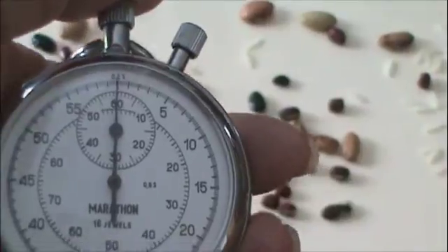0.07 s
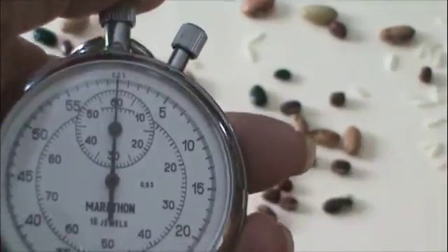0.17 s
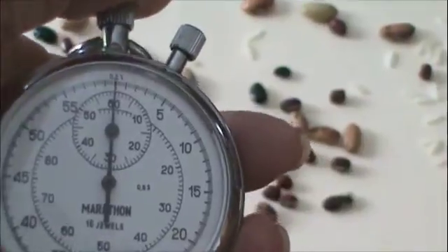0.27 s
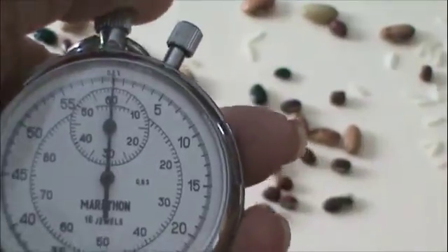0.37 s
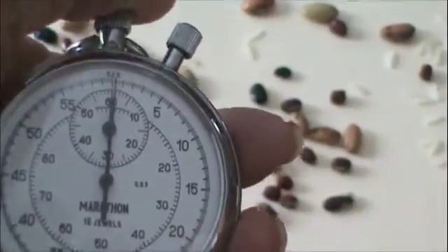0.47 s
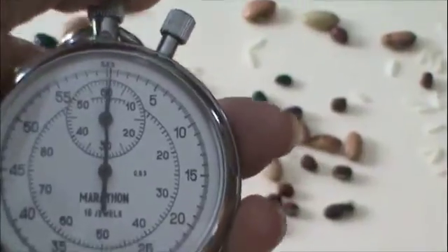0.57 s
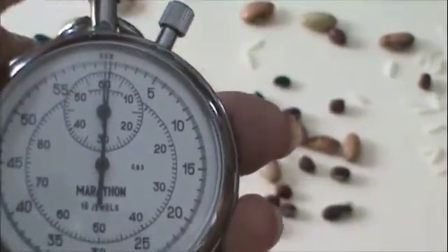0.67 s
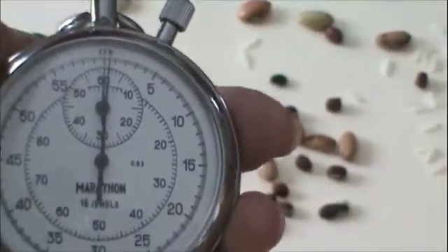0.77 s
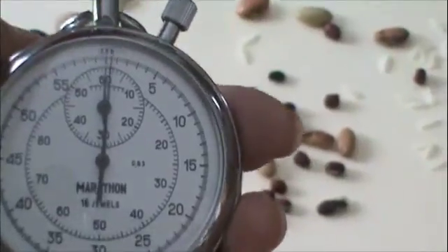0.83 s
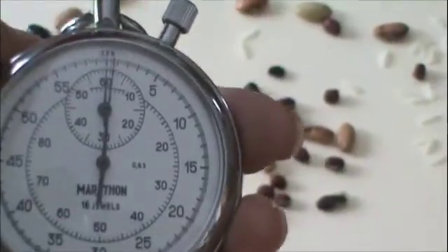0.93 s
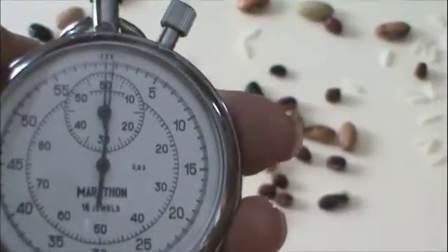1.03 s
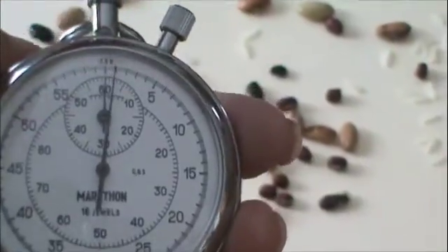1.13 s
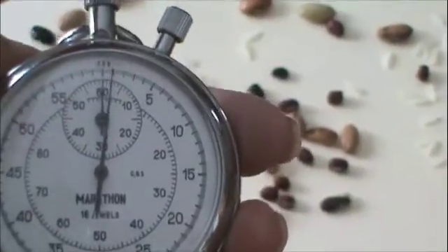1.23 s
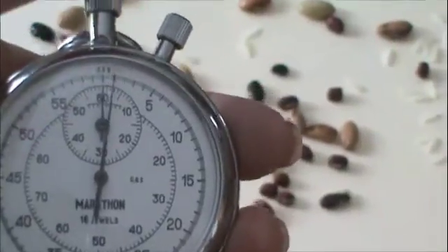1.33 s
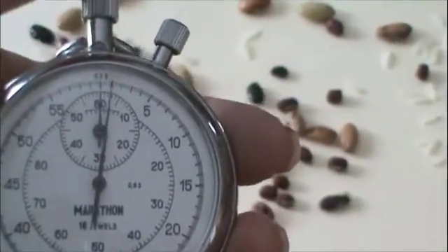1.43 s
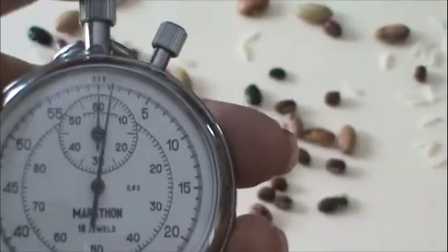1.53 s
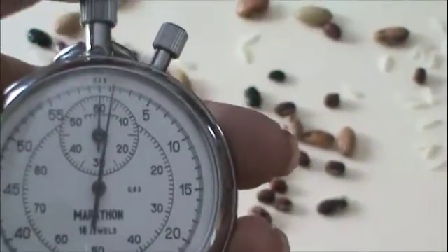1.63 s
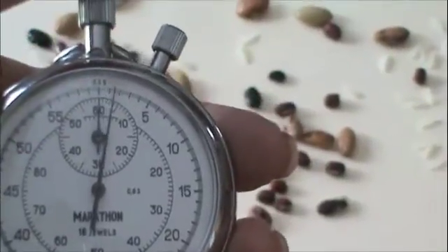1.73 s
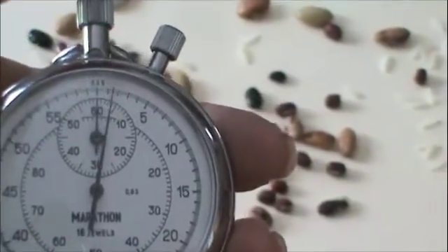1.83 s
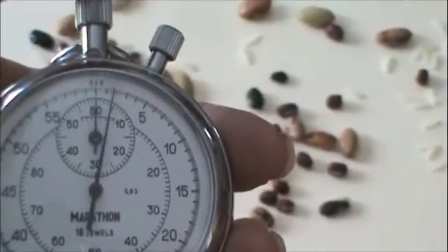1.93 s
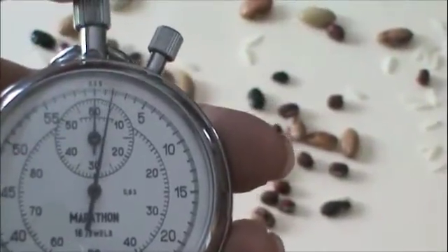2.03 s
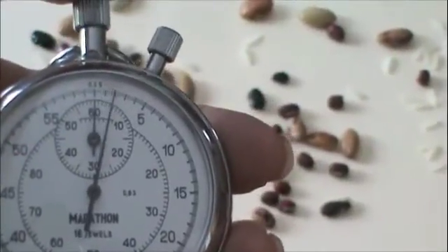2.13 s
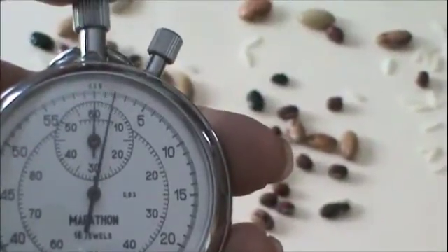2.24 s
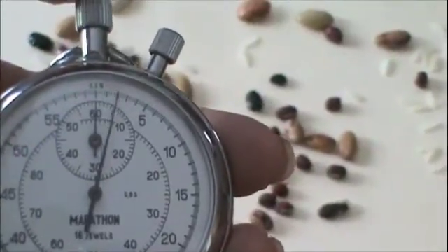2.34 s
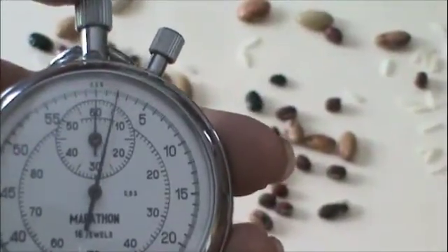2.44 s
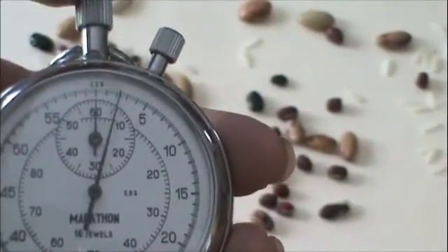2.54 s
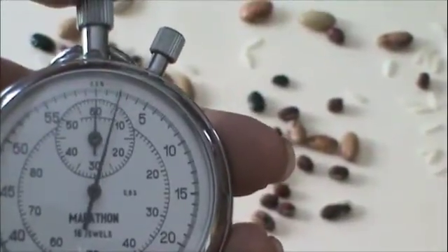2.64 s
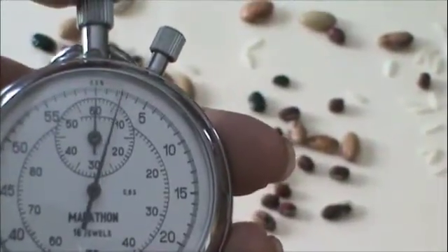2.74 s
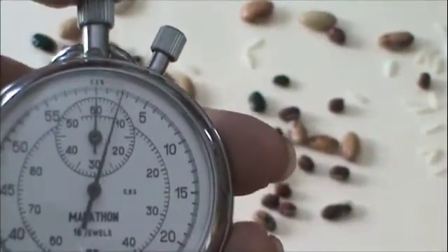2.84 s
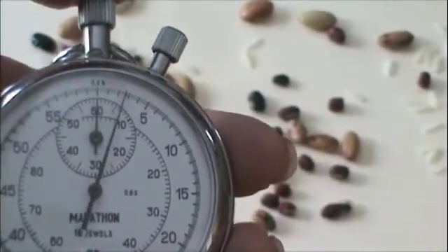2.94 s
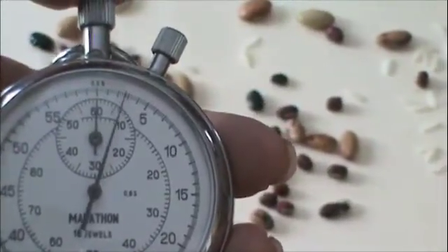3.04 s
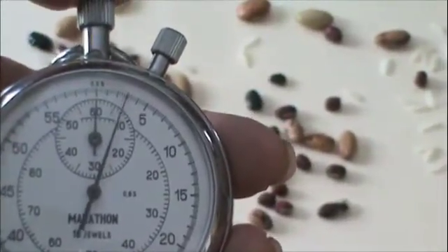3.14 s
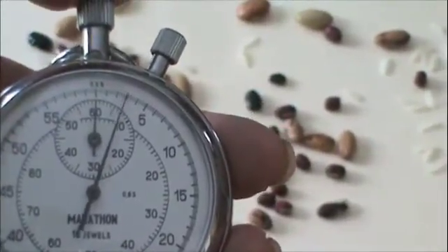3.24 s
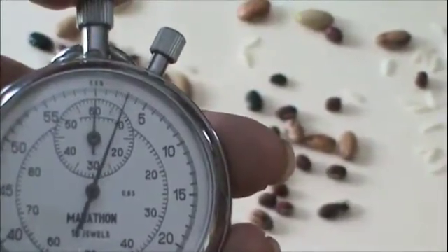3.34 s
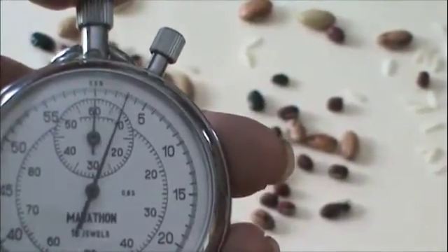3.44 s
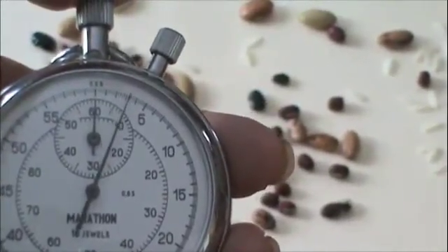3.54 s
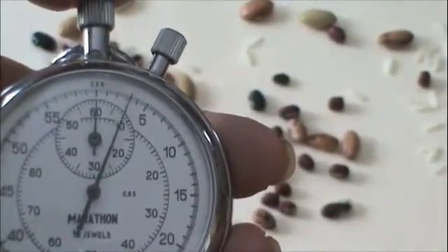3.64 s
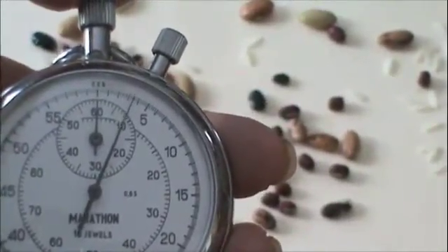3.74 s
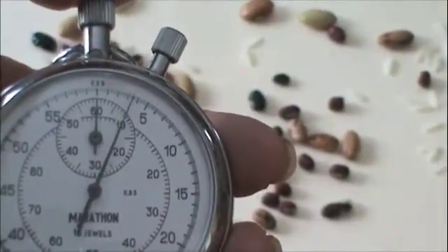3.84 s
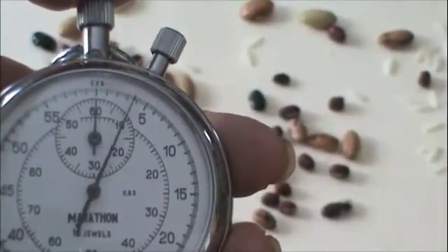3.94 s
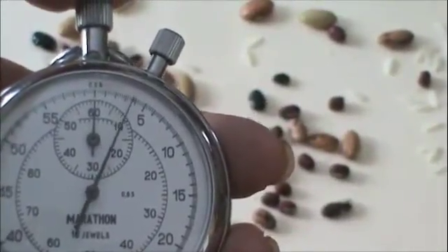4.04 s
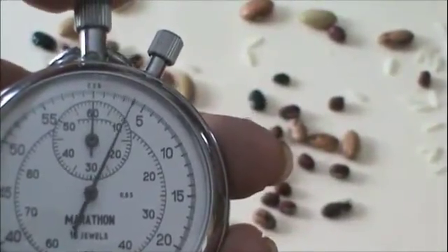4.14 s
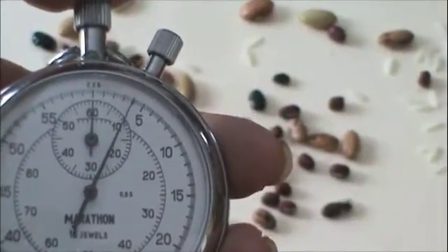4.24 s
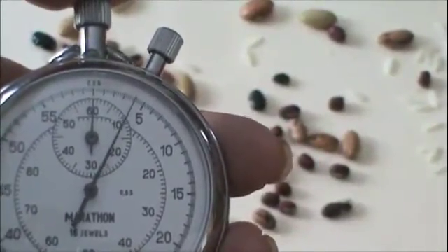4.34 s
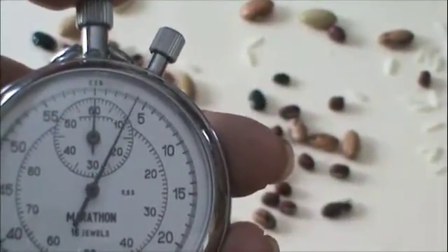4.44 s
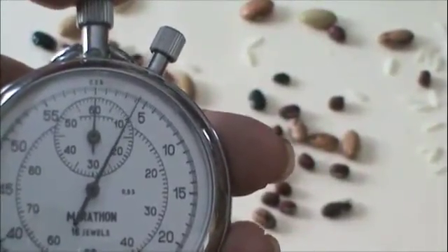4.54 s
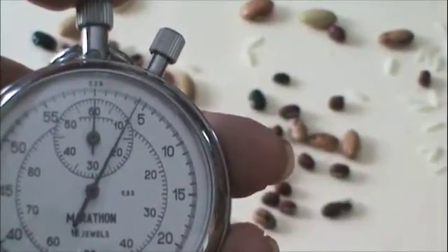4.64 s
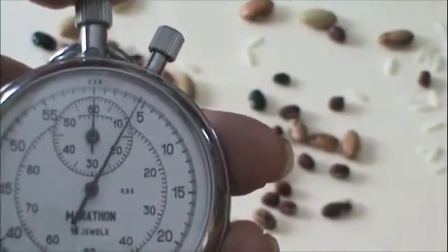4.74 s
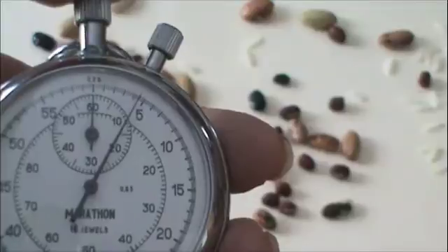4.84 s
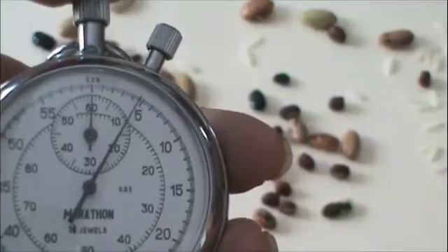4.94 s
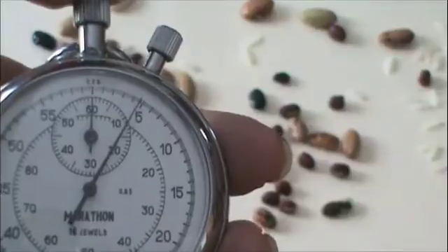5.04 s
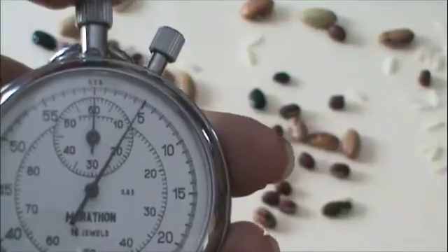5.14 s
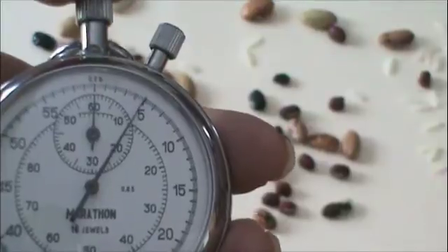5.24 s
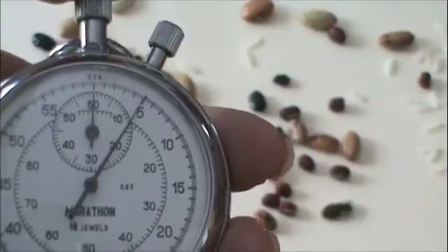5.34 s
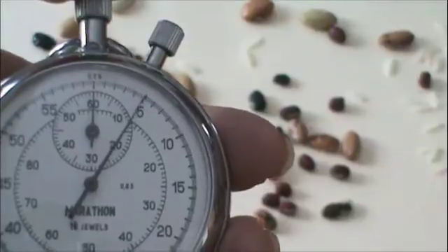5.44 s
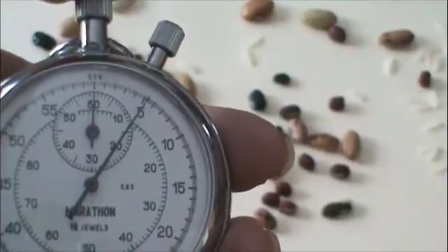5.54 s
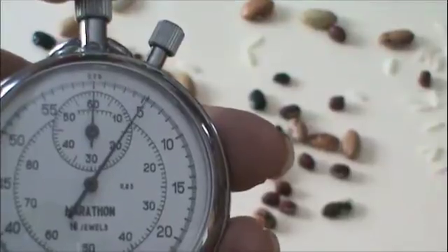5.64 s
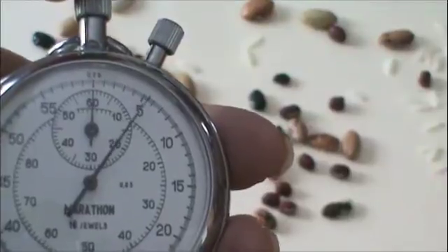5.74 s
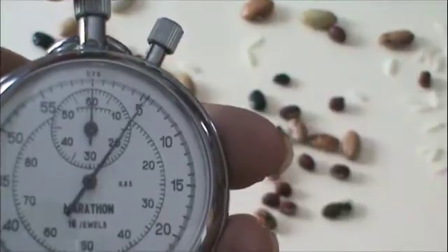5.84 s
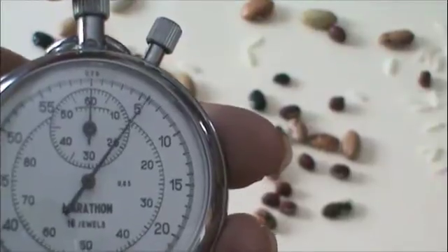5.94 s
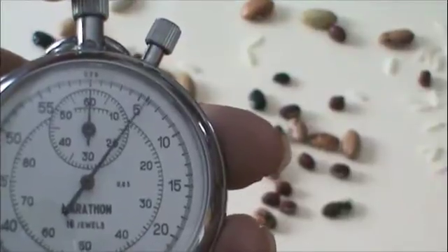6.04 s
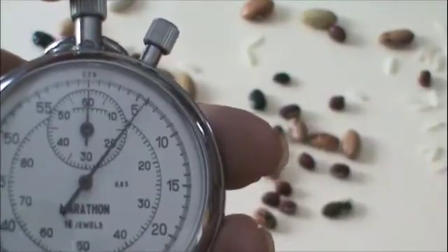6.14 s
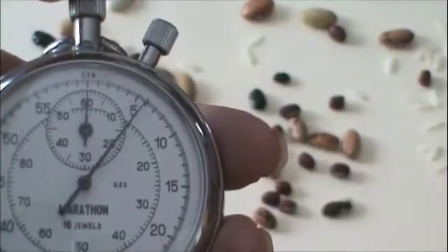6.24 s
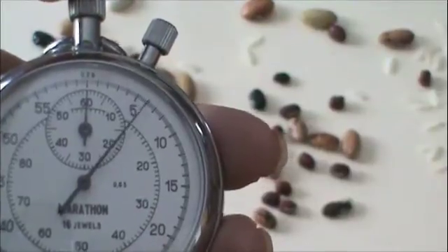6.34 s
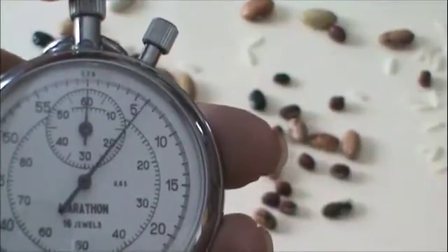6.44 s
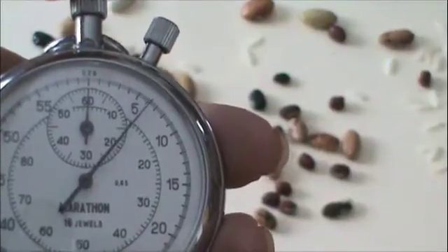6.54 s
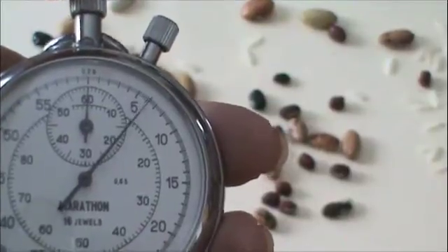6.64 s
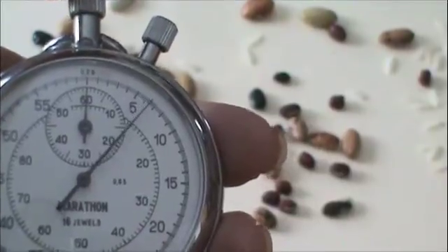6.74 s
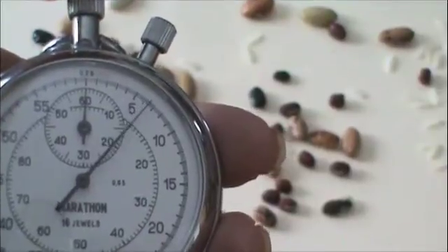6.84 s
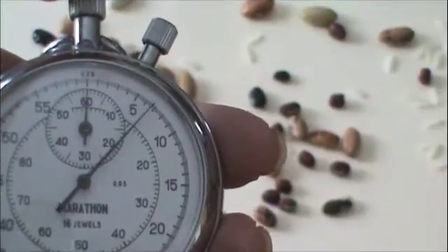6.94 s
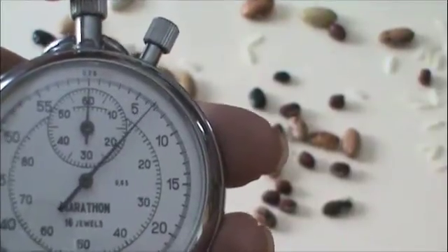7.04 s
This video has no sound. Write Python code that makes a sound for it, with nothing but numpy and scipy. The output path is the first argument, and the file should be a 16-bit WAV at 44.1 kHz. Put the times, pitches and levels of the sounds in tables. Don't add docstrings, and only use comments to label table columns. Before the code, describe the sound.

Crisp steel button clicks with a brief springy ring, a short camera motor purr, then thin rapid ticking in a small humming room.

```python
import sys
import numpy as np
from scipy import signal
from scipy.fft import rfft, irfft
from scipy.io import wavfile
from scipy.ndimage import uniform_filter1d

SR = 44100
rng = np.random.default_rng(int(sys.argv[2]) if len(sys.argv) > 2 else 0)


def store_wav(level_fs):
    pcm = np.round(np.clip(np.atleast_2d(level_fs), -1, 1) * 32767)
    wavfile.write(sys.argv[1], SR, pcm.T.astype(np.int16))


def magnitude_from_level(level_db):
    exponent = np.asarray(level_db, float) / 20
    return 10 ** exponent


N = 313234


def evened(x):
    return x / np.sqrt(np.mean(x ** 2) + 1e-20)


def read(points, hz):
    f, value = np.transpose(points)
    return np.interp(np.log(hz + 1), np.log(f + 1), value)


def follow(curve, column=1):
    rows = np.array(curve)
    return np.interp(np.arange(N) / SR, rows[:, 0], rows[:, column])


def wander(rate_hz):
    pole = np.exp(-2 * np.pi * rate_hz / SR)
    return evened(signal.lfilter([1], [1, -pole], rng.standard_normal(N)))


def ring(modes, rise_ms=0.249):
    t = np.arange(SR // 4) / SR
    body = 0
    for hz, width_hz, db in modes:
        body = body + magnitude_from_level(db) * np.exp(-np.pi * width_hz * t) * np.sin(2 * np.pi * hz * t)
    body *= (1 - np.exp(-1000 * t / rise_ms)) ** 2
    return body / abs(body).max()


def add(force, s, db, rattle_ms, habit=0):
    t = np.arange(500) / SR / (max(rattle_ms, .1) / 1000)
    grit = rng.standard_normal(500) * magnitude_from_level(2.0 * rng.exponential(1, 500)) + habit
    clatter = grit * t * np.exp(-2 * t)
    part = force[round(s * SR):][:500]
    part += (magnitude_from_level(db) * clatter / np.linalg.norm(clatter))[:len(part)]


def air():
    # pitch_hz, level_db (per Hz)
    air_color = [(15, -55), (40, -19), (110, -8.5), (200, -9.5), (330, -7.5), (500, -13.5), (950, -16),
                 (2200, -26), (5300, -28.5), (6200, -26.5), (7200, -29), (12000, -29), (15850, -29.5),
                 (16100, -50.5)]
    # pitch_hz, side_minus_mid_db
    side_share = [(60, -30), (99, -31.5), (160, -13.5), (270, -14.5), (450, -7), (740, -3), (1220, -0.5),
                  (2010, 4.5), (3330, 1), (5500, -0.5), (9080, -5.5), (15000, -22.5)]
    # pitch_hz, left_minus_right_db
    lean = [(60, -2.5), (240, 0.5), (950, -1.5), (3770, -0.5), (15000, -1)]
    frames, hz = N // 512 + 5, np.fft.rfftfreq(2048, 1 / SR)
    real, imaginary, patches = rng.standard_normal((3, 2, len(hz), frames))
    patches = uniform_filter1d(patches[0], size=20, axis=0)
    patches = evened(uniform_filter1d(patches, size=8, axis=1))
    z = (real + 1j * imaginary) * magnitude_from_level(read(air_color, hz)[:, None] + 0.63 * patches)
    z[1] *= magnitude_from_level(read(side_share, hz))[:, None]
    z[1] += z[0] * (np.log(10) / 40 * read(lean, hz))[:, None]
    mid, side = signal.istft(z, nperseg=2048, noverlap=1536)[1][:, :N]
    return magnitude_from_level(-59.5) * np.array([mid + side, mid - side]) / mid.std()


def duct():
    # time_s, level_db
    draught = [(0, -75), (1.4, -67), (3.3, -70.5), (3.8, -90), (4.6, -70), (6.6, -70.5), (7.2, -53.5)]
    hz, width_hz = 950, 90
    band = signal.butter(2, [hz - width_hz / 2, hz + width_hz / 2], "bandpass", fs=SR, output="sos")
    noise = signal.sosfilt(band, rng.standard_normal((2, N)))
    return magnitude_from_level(follow(draught) - 6.0) * evened(noise + 0.51 * noise[::-1])


def hum():
    # pitch_hz, level_db
    tones = [(47.3, -81.5), (59.2, -74), (65.8, -72), (94.6, -80.5), (141.9, -71), (189.2, -61.5),
             (236.6, -64.5), (261, -85), (296, -79), (380, -83.5), (391, -78), (426, -79.5), (15734, -87)]
    # time_s, pitch_hz, level_db
    far_motor = [(0, 122, -59.5), (.6, 125.5, -67), (1.5, 127.2, -64), (2.06, 130, -66.5),
                 (3.0, 135.2, -59.5), (3.26, 133.7, -61.5), (3.52, 122, -67.5), (3.74, 115, -64.5),
                 (4.0, 113.5, -66), (4.9, 116.5, -65.5), (5.3, 117.6, -59.5), (7.2, 120, -66)]
    t = np.arange(N) / SR
    steady = np.zeros(N)
    for hz, db in tones:
        level = magnitude_from_level(db + 1.15 * wander(0.88))
        phase = 2 * np.pi * (hz * t + rng.random()) + 0.39 * wander(0.36)
        steady += level * np.sin(phase)
    turns = np.cumsum(follow(far_motor)) / SR
    far = magnitude_from_level(follow(far_motor, column=2)) * np.sin(2 * np.pi * turns)
    return np.sqrt(2) * (steady + far)


def focus_motor():
    # time_s, level_db
    run = [(0, -52.5), (.4, -53), (1.1, -59), (1.3, -51.5), (1.8, -51.5), (2.22, -51.5), (2.27, -80),
           (7.2, -80)]
    # pitch_hz, width_hz, level_db
    camera_body = [(1826, 127, 2), (2352, 50, -4), (3470, 47, -11), (4770, 88, 1), (6760, 300, -7),
                   (8600, 600, -11.5)]
    # pitch_hz, width_hz, level_db
    gears = [(6050, 800, 2), (6600, 820, 0), (8700, 830, 2)]
    frames_per_s = 29.97
    force, run_db = np.zeros(N), follow(run)
    for s in np.arange(.0145, 2.3, 1 / frames_per_s):
        step_db = run_db[round(s * SR)]
        add(force, s, step_db - 3.0 + 1.2 * rng.standard_normal(), .1)
        add(force, s + 0.017, step_db - 12, 3.0)
    rubbing = magnitude_from_level(run_db - 28.5) * rng.standard_normal(N)
    whirr = signal.oaconvolve(rubbing, ring(gears))[:N]
    return signal.oaconvolve(force, ring(camera_body, rise_ms=1.14))[:N] + whirr


def room(x):
    # pitch_hz, t60_s
    decay = [(700, 0.9), (2500, 0.43), (5000, 1), (9000, 0.35), (15000, 0.54)]
    taps = np.zeros((2, SR))
    slots = np.arange(SR // 20 - 6) * 20 + 100
    at = slots + rng.integers(0, 20, (2, len(slots)))
    np.put_along_axis(taps, at, rng.choice([-1., 1.], at.shape), 1)
    hz, t, z = signal.stft(taps + 0.077 * taps[::-1], SR, nperseg=256)
    fade = magnitude_from_level(-60 * t / read(decay, hz)[:, None])
    tail = signal.istft(z * fade, SR, nperseg=256)[1]
    return signal.fftconvolve(x[None], tail / np.linalg.norm(tail[0]), axes=1)[:, :N]


def shudder():
    # start_s, rustle_db (rms), plate_db, t60_s
    chatters = [
        (.342, -65.5, -79, .25),
        (0.431, -39.5, -54, 0.65),
        (.682, -49.5, -71, 0.37),
    ]
    # pitch_hz, level_db (per Hz)
    rustle_color = [(700, -11.5), (1300, -4.5), (2600, 3.5), (3700, -7.5), (4800, -1.5), (5800, 2.5),
                    (6800, -4.5), (9000, 0), (12000, -7.5), (15500, -20.5)]
    # pitch_hz, width_hz, level_db
    back_plate = [(2330, 42, -15), (2793, 40, 0), (2870, 58, -2), (4770, 25, 1), (4820, 25.5, -2),
                  (6830, 65, 2.5), (8640, 90, -7), (9600, 110, -1), (13500, 220, -2)]
    t = np.arange(N) / SR
    rustle, shaking = np.zeros((2, N))
    for s, rustle_db, plate_db, t60 in chatters:
        fade_db = -60 * (t - s) / t60
        rustle += magnitude_from_level(rustle_db + fade_db) * (t > s)
        shaking += magnitude_from_level(plate_db + fade_db) * (t > s)
    color = magnitude_from_level(read(rustle_color, np.fft.rfftfreq(N, 1 / SR)))
    wide = irfft(rfft(rng.standard_normal((2, N))) * color, N)
    singing = signal.oaconvolve(shaking * rng.standard_normal(N), ring(back_plate))[:N]
    return rustle * evened(wide + 0.27 * wide[::-1]) + singing


def snaps():
    # start_s, level_db, pitch_hz, width_hz
    knocks = [(.3392, -23.5, 2400, 400), (.3390, -37, 695, 700), (.3394, -20.5, 9300, 1400),
              (0.3395, -31.5, 2794, 140), (0.4272, -18.5, 2290, 650), (.4280, -40, 650, 600),
              (.4284, -10, 9180, 700), (0.4288, -13, 11480, 1500), (0.43, -18, 14400, 1300),
              (.4286, -33, 1270, 149), (0.4297, -29.5, 2650, 110), (.4284, -30, 4824, 36),
              (0.4286, -35, 6820, 40), (0.6772, -34, 1324, 90), (0.678, -24, 14500, 1800),
              (.6780, -16, 7700, 900), (.6806, -16, 8140, 900), (.6790, -15, 10800, 1500),
              (0.68, -21, 2780, 238), (1.1800, -44.5, 1650, 350), (1.1804, -41, 2900, 400),
              (1.1817, -25.5, 8950, 700), (1.7512, -44, 4200, 900), (1.7525, -44, 2900, 298),
              (2.234, -41, 6500, 700), (2.392, -46.5, 2770, 250)]
    out = np.zeros(N + SR)
    for s, db, hz, width_hz in knocks:
        rise_ms = 0.23 + 60 / width_hz
        out[round(s * SR):][:SR // 4] += magnitude_from_level(db) * ring([(hz, width_hz, 0)], rise_ms)
    return out[:N]


def button_strikes():
    strikes = {"crown": [(.4262, -36), (.4276, -8.5), (.4296, -15.5)], "lever": [(.6774, -13),
               (.6788, -13.5), (.6800, -17), (1.1818, -28.5), (1.7535, -44)], "pawl": [(.650, -42),
               (.6712, -37), (1.7509, -31)], "band": [(.0304, -46), (.1184, -49), (.3388, -25.5),
               (1.2191, -48), (1.4486, -47), (1.7774, -48)], "back": [(.4524, -33), (.7014, -52),
               (1.1795, -29.5), (1.1845, -38.5), (2.3925, -40), (2.3984, -47)], "bezel": [(.7535, -34),
               (1.133, -42), (2.2333, -38.5)]}
    shares = {"crown": (-1.5, -5, -14, -4.5, -40), "lever": (-1, -8.5, -23, -9.5, -30),
              "pawl": (2.5, -18, -24, -16, -14), "band": (-1, -19.5, -26, 0, -3),
              "back": (0, -18, 0.5, -0.5, -8), "bezel": (-4, -3, -16, -16, -25)}
    forces = np.zeros((5, N))
    for spot, blows in strikes.items():
        for s, db in blows:
            for force, share_db in zip(forces, shares[spot]):
                add(force, s, db + share_db, rattle_ms=1.19)
    return forces


def escapement():
    # delay_s, level_db (under the beat), rattle_ms
    tick_parts = [
        (-.0140, -13, .7),
        (.0002, 4.5, .1),
        (.0009, 0., .1),
        (.0019, -6, .5),
    ]
    # delay_s, level_db (under the beat), rattle_ms
    tock_parts = [
        (-.0160, 2, 2.2),
        (.0002, .5, .1),
        (.0010, -4, .3),
        (.0021, -3, .9),
    ]
    # time_s, level_db
    facing = [(.5, -51), (1.3, -42.5), (2.4, -46), (4.2, -41), (6.6, -44.5), (7.0, -46)]
    first_tick_s, swing_s, tock_after_s = .5262, .40077, .2001
    usual_tock_db = -49
    pallets, plate = np.zeros((2, N))
    habits = 6.8 * rng.standard_normal((2, 4, 500))
    facing_db = follow(facing)
    for at in np.arange(first_tick_s, N / SR, swing_s):
        tick_db = facing_db[round(at * SR)] + 0.3 * rng.standard_normal()
        tock_db = usual_tock_db + 1.4 * rng.standard_normal()
        beats = ((at, tick_db, tick_parts), (at + tock_after_s, tock_db, tock_parts))
        for (s, db, parts), beat_habits in zip(beats, habits):
            add(plate, s - .002, -58.0 + 0.29 * (db - usual_tock_db), 2.5)
            add(plate, s + 0.009, -63., 3.0)
            add(plate, s + parts[0][0], -62., 2.5)
            for (delay_s, under_db, rattle_ms), habit in zip(parts, beat_habits):
                add(pallets, s + delay_s, db + under_db, rattle_ms, habit)
    return pallets, plate


def watch():
    # pitch_hz, width_hz, level_db
    works_modes = [(7560, 437, -9), (8580, 310, -3.5), (9190, 660, 11), (9580, 250, -4), (10920, 192, -10),
                   (11500, 420, -1), (13150, 530, -3), (14540, 700, -8.5), (15800, 1100, -21)]
    rim_modes = [(5500, 470, -3), (6090, 500, -1), (6400, 440, -5), (6630, 200, -13), (7460, 400, -5.5)]
    lid_modes = [(4000, 300, -42.5), (4760, 45.6, 3.5), (4830, 64, 2), (4440, 340, 13)]
    case_modes = [(2000, 830, -2), (2400, 434, -4), (2720, 246, -0.5), (3220, 382, -10.5)]
    grip_modes = [(1700, 560, 0)]
    pallet_modes = [(8120, 490, -1), (9600, 1190, -23), (9430, 940, 5), (9440, 420, 1), (10700, 540, -1.5),
                    (12500, 1500, -7), (15000, 2500, -9)]
    plate_modes = [(2918, 104, -0.5), (3100, 170, 1), (2690, 330, -10)]
    pallets, plate = escapement()
    works, rim, lid, case, grip = button_strikes()
    parts = ((works, works_modes, .1), (rim, rim_modes, .2), (lid, lid_modes, .25), (case, case_modes, .3),
             (grip, grip_modes, .26), (pallets, pallet_modes, .1), (plate, plate_modes, .6))
    sound = snaps()
    for force, modes, rise_ms in parts:
        sound = sound + signal.oaconvolve(force, ring(modes, rise_ms))[:N]
    return signal.sosfilt(signal.butter(2, 400, "highpass", fs=SR, output="sos"), sound)


def scene():
    near = watch()
    edge = 0.088 * (np.roll(near, 3) - np.roll(near, -3))
    direct = np.array([magnitude_from_level(-0.8) * near + edge, magnitude_from_level(-1.8) * near - edge])
    reverb = magnitude_from_level(-12.5) * room(signal.lfilter(*signal.butter(1, 5000, fs=SR), near))
    motor = focus_motor() * magnitude_from_level([[.6], [-.6]])
    machines = motor + hum() * magnitude_from_level([[-.15], [.15]]) + duct()
    return direct + shudder() + reverb + machines + air()


def low_pass(x):
    return signal.sosfilt(signal.butter(12, 16650, fs=SR, output="sos"), x)


def record(dry):
    band_limit = signal.firwin(301, 16250, window=("kaiser", 9), fs=SR)
    dry = signal.oaconvolve(dry, band_limit[None], "same")
    mid, side = (dry[0] + dry[1]) / 2, (dry[0] - dry[1]) / 2
    kept = signal.sosfiltfilt(signal.butter(4, 10500, fs=SR, output="sos"), side)
    mid_treble = mid - signal.sosfiltfilt(signal.butter(4, 10400, fs=SR, output="sos"), mid)
    side = kept + .15 * mid_treble
    return low_pass(np.array([mid + side, mid - side]))


dry = scene()
out = record(dry)
store_wav(out)
```